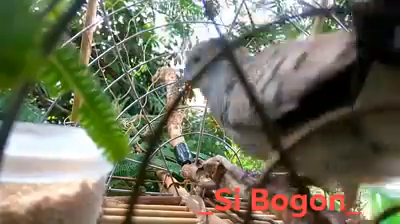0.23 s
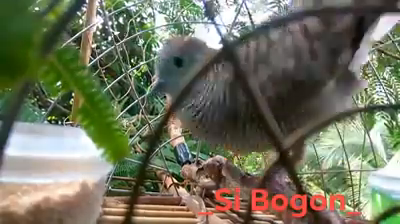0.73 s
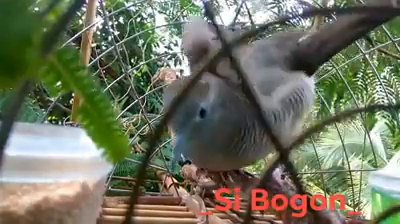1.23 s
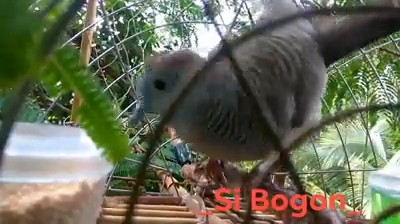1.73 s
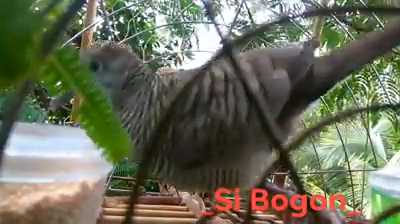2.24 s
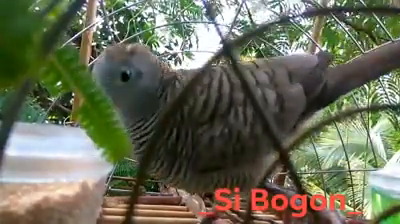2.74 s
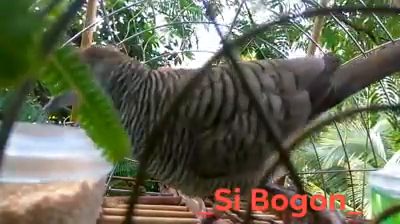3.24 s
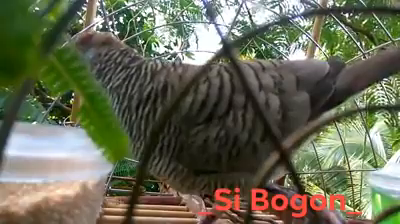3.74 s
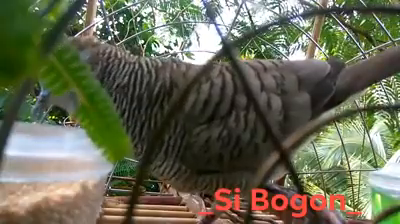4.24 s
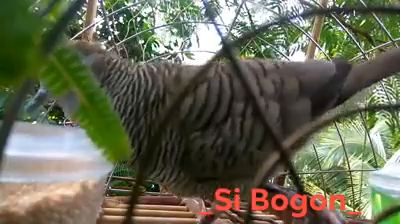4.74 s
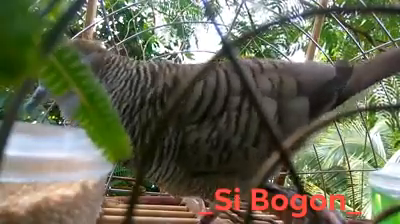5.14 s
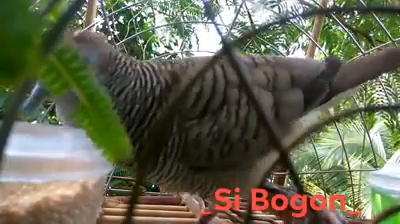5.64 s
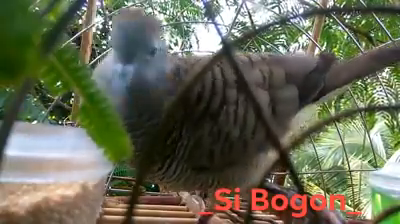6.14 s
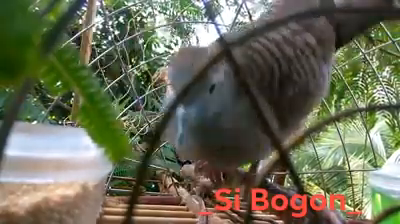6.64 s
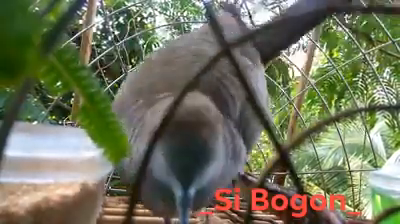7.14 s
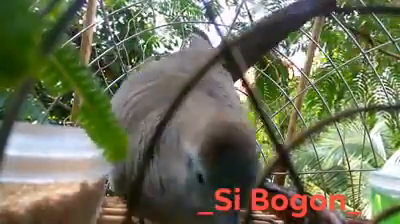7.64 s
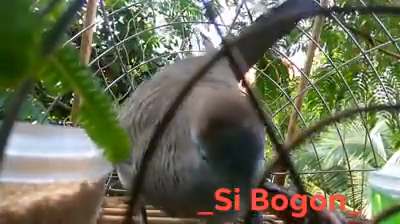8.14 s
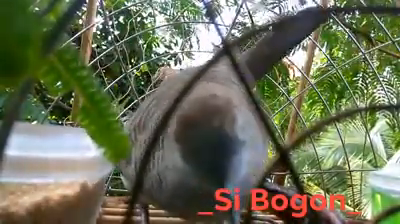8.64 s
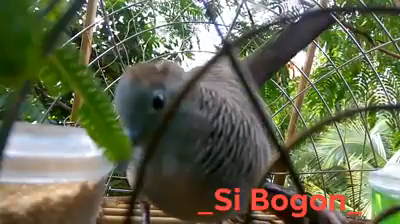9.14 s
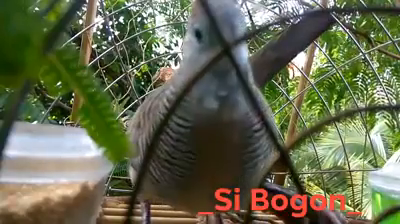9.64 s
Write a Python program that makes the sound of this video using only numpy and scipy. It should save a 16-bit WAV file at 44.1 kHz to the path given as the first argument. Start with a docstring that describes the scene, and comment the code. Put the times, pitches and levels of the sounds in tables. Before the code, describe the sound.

Close outdoor stereo pickup, with the near dove strongly toward the right. Its coos are almost pure, round, whistle-like tones with throaty rattling starts, packed into rapid loud bursts with long pauses. Between bursts a much fainter dove farther away repeats five fluttering notes with a slight echo. Low town rumble and thin leaf hiss continue underneath, with faint small-bird chips early, sparse dry cage ticks and a brief distant motor drone later.

```python
"""A caged zebra dove coos loudly, close by, in rapid stuttering phrases of nearly pure, pitch-swept tones.
Each close coo opens with a rattle of throat pulses, swells as it rises, flips into a higher register, sinks.
Farther off a second dove repeats a soft five-note phrase, fluttering as each note catches.
Behind them a garden: shaped noise for town rumble and leaf hiss, wavering tones for a far motor and
town hum, short noise bursts for a few ticks and a small bird's chips."""
import sys
import numpy as np
from scipy import signal
from scipy.fft import rfft, irfft
from scipy.io import wavfile
from scipy.ndimage import uniform_filter1d, minimum_filter1d

SR = 44100
rng = np.random.default_rng(int(sys.argv[2]) if len(sys.argv) > 2 else 0)


def unload_audio(sound):
    """Save the sound as a 16-bit wav file, at the path given as the first command line argument."""
    columns = np.transpose(np.atleast_2d(sound))
    # keep every value between -1 and 1, then stretch to whole-number steps
    steps = np.round(np.clip(columns, -1, 1) * 32767)
    wavfile.write(sys.argv[1], SR, steps.astype(np.int16))


N = 435708
TIME_S = np.arange(N) / SR
FLIP_HZ = 980.3  # pitch at which a note flips into the high register
SPLIT_HZ = 500  # rumble below, hiss above

# Close coos. Each row: onset in seconds, rise up to the register flip in seconds, hold after it in seconds,
# top pitch in Hz, hold level in dB, strain (0-1).
CLOSE_COOS = [(2.697, 0.060, 0.035, 1198, -14, 0), (2.794, 0.02, 0.022, 1156, -13, 0),
              (2.848, 0.021, 0.019, 1113, -12.5, 0), (2.923, 0.024, 0.017, 1100, -11.5, 0),
              (3.014, 0.024, 0.028, 1136, -15.5, 0.03), (3.121, .026, 0.083, 1165, -16, 0.03),
              (6.206, 0.073, 0.011, 951, -13.5, 0), (6.508, 0.053, 0.035, 1162, -14.5, 0.02),
              (6.600, 0.029, 0.024, 1135, -17, 0), (6.674, 0.024, 0.02, 1095, -17, 0.06),
              (6.758, 0.025, 0.022, 1096, -16.5, 0.07), (6.852, 0.026, 0.044, 1125, -17.5, 0),
              (9.664, 0.053, 0.044, 1182, -12.5, 0), (9.744, 0.025, 0.028, 1174, -12.5, 0.04),
              (9.797, 0.022, 0.02, 1120, -9, 0.26)]
# Shared by the coos of one phrase. Each row: valid from in seconds, starting pitch in Hz, swell level in dB,
# left-right in dB, third harmonic in dB, hiss in dB, rattle pulses per second, pulse ringing in Hz,
# pulse growth in dB.
CLOSE_PHRASES = [(2.6, 848, -12, -20.5, -49, -16.5, 215, 1085, 13),
                 (6.1, 876, -10.5, -18, -54, -10, 130, 930, 3),
                 (6.45, 816, -10, -16, -42.5, -1, 160, 995, 10),
                 (9.6, 843, -9.5, -15, -39.5, -5.5, 205, 1014, 12)]
# Hesitant starts, separate throat pops. Each row: start in seconds, level in dB, ringing in Hz.
THROAT_POPS = [(6.117, -27.5, 990), (6.127, -34, 970), (6.142, -26.5, 980), (6.149, -19.5, 1020),
               (6.166, -18.5, 1010), (6.177, -22, 980), (6.182, -22.5, 950), (6.189, -20, 920),
               (6.201, -21, 950), (9.873, -21, 1000)]
# Rasp below the pitch: low edge in Hz, high edge in Hz.
RASP_BAND_HZ = (390, 760)
# Bands of hiss that follow the coo. Each row: low edge in Hz, high edge in Hz, level in dB,
# to which the phrase's hiss level is added.
COO_HISS = [(1700, 2000, -43.5), (2680, 3550, -48), (6200, 6800, -47.5)]
RATTLE_SHARE = .33  # part of the rise that is rattle, before the tone catches
CATCH_DEPTH = .35  # flutter as a note catches (0-1)
SINK_SHARE = .17  # part of the top pitch lost over the hold


def close_dove(second_db=-39, overtones_lean_db=-9, rasp_db=7.0, swell_rasp_db=-48, crop_hz=1290):
    """Nearly pure coos through the inflated crop, each led in by a growing rattle of throat pulses."""
    voice, overtones = np.zeros((2, N)), np.zeros((2, N))
    pulses, end_s = list(THROAT_POPS), 0
    for onset_s, rise_s, hold_s, top_hz, hold_db, strain in CLOSE_COOS:
        phrase = [p for p in CLOSE_PHRASES if p[0] <= onset_s][-1]
        _, low_hz, swell_db, lean_db, third_db, hiss_db, rate_hz, ring_hz, growth_db = phrase
        voiced_s = onset_s + RATTLE_SHARE * rise_s
        level, phase, upper = coo((1 - RATTLE_SHARE) * rise_s, hold_s, scoop_from(low_hz, voiced_s - end_s),
                                  top_hz, swell_db, hold_db, strain, CATCH_DEPTH, SINK_SHARE,
                                  flutter_hz=rate_hz)
        size = len(phase)
        end_s = onset_s + rise_s + hold_s
        pulses += rattle(onset_s, voiced_s, end_s, swell_db, rate_hz, ring_hz, growth_db)

        # rasp: faint in every swell, strong when a strained note breaks up
        rasp_gain = from_db(rasp_db) * upper * strain ** 2 + from_db(swell_rasp_db) * (1 - upper)
        rasp = rasp_gain * hiss_in(*RASP_BAND_HZ, size, order=6)
        add(voice, voiced_s, pan(lean_db) * level * (np.sin(phase) + rasp))

        # a clean second harmonic comes out in the high register
        clean = upper * from_db(second_db) * np.sin(2 * phase) + whistles(phase, 1)
        # a grainy third harmonic and bands of hiss follow the coo, by phrase
        hiss = sum(from_db(db) * hiss_in(low, high, size) for low, high, db in COO_HISS)
        grain = from_db(4 * drift(300)[:size] - 1)
        third = from_db(third_db) * ragged(phase, order=3)
        harsh = (.5 + .5 * upper) * grain * (third + from_db(hiss_db) * hiss)
        add(overtones, voiced_s, pan(overtones_lean_db) * level * (clean + harsh))
    voice += pan(-15) * throat(pulses, t60_s=.0075)
    # beak shut: the sound leaves through the crop, which passes little above the pitch
    return band(voice, 190, crop_hz, order=8) + overtones + buzzes()


STRAIGHT_FALL_S, ARCHING = .017, .7  # a hold this long sinks evenly; longer ones stay up, then drop
CLIMB_S = .01  # time constant of the climb after the flip


def coo(swell_s, hold_s, start_hz, top_hz, swell_db, hold_db, rough, catch, sink, flutter_hz=200,
        flip_s=.0026, release_s=.015, bend=.063, climb=0, lift_hz=0):
    """Envelope, phase and register (0 low, 1 high) of a note: rising swell, flip upward, sinking hold."""
    t = np.arange(0, swell_s + hold_s, 1 / SR)
    rise = np.clip(t / swell_s, 0, 1)
    fall = np.clip((t - swell_s) / hold_s, 0, 1)
    upper = .5 + .5 * np.tanh((t - swell_s) / flip_s)

    arch_hz = top_hz * (1 - sink * fall ** ((hold_s / STRAIGHT_FALL_S) ** ARCHING))
    arch_hz = arch_hz * (1 - climb * np.exp(-fall * hold_s / CLIMB_S))
    swell_hz = lift_hz + start_hz + (min(FLIP_HZ, top_hz) - start_hz) * rise
    pitch_hz = (1 - upper) * swell_hz + upper * arch_hz

    swell = from_db(swell_db) * np.interp(rise, [0, .8], [.22, 1])
    level = (1 - upper) * swell + upper * from_db(hold_db)
    level = level * np.clip(t / .0036, 0, 1) * np.clip((t[-1] - t) / release_s, 0, 1)

    # the rattle lives on as a flutter while the tone is catching; it returns in a strained hold
    flutter = np.sin(2 * np.pi * np.cumsum(flutter_hz * (1 + .4 * drift(44)[:len(t)])) / SR)
    depth = rough * upper + catch * (1 - rise) ** 2
    pitch_hz = pitch_hz * (1 + bend * depth * flutter + .0009 * drift(150)[:len(t)])
    phase = 2 * np.pi * np.cumsum(pitch_hz) / SR
    return np.sqrt(2) * level * (1 + depth * flutter), phase, upper


def scoop_from(low_hz, pause_s, slacken_s=.0022):
    """The pitch slackens in a pause: a note slurred onto the last one starts near the flip."""
    return low_hz + (FLIP_HZ - low_hz) * np.exp(-max(pause_s, 0) / slacken_s)


TREMBLE_S, TREMBLE_DB = .02, -36.5  # tremble after a note; level relative to the swell


def rattle(onset_s, voiced_s, end_s, swell_db, rate_hz, ring_hz, growth_db, rattle_db=-3.5):
    """Throat pulses, (s, dB, Hz): they grow until the tone catches, and tremble on faintly after it ends."""
    lead_s = voiced_s - onset_s
    chance = rng.standard_normal((2, 20, 2))
    before, after = [], []
    for s, (slip, force) in zip(np.arange(0, lead_s, 1 / rate_hz), chance[0]):
        db = swell_db + rattle_db - growth_db * (1 - s / lead_s) + .78 * force
        before.append((onset_s + s + .00055 * slip, db, ring_hz))
    for s, (slip, force) in zip(np.arange(0, TREMBLE_S, 1 / rate_hz), chance[1]):
        after.append((end_s + s + .00096 * slip, swell_db + TREMBLE_DB + 2 * force, ring_hz))
    return before + after


def throat(pulses, t60_s, low_hz=680, puff_db=-35, puff_s=.0025):
    """Each (s, dB, Hz) pulse rings briefly in the inflated crop, with little bass, and puffs out air."""
    out, t = np.zeros(N), TIME_S[:SR // 40]
    click = np.eye(1, len(t))[0]
    for s, db, hz in pulses:
        response = ring(ring(click, hz, t60_s), hz * .93, t60_s)
        response = band(response, low_hz, 2900, order=3)
        puff = from_db(puff_db) * band(rng.standard_normal(len(t)), 1100, 5000) * np.exp(-t / puff_s)
        add(out, s, from_db(db) * (response / np.abs(response).max() + puff))
    return out


def ragged(phase, order, scatter=.14):
    """A harmonic whose timing slips from cycle to cycle."""
    return np.sin(order * phase + scatter * np.sqrt(order) * drift(300)[:len(phase)])


# Whistles that move with a coo. Each row: offset from its pitch in Hz (negative for a mirror image),
# level beside a close coo in dB, level beside a far coo in dB.
WHISTLE_LINES = [(3757.5, -50.5, -23), (-7500, -61.5, -26.5), (7507, -61, -26), (11254, -69.5, -30)]


def whistles(phase, column):
    """Faint high lines that keep a fixed distance from the pitch."""
    t = np.arange(len(phase)) / SR
    return sum(from_db(row[column]) * np.sin(phase + 2 * np.pi * row[0] * t) for row in WHISTLE_LINES)


# Brief buzzes at four register flips. Each row: centre in seconds, level in dB.
FLIP_BUZZES = [(6.56, -42.5), (9.718, -32), (9.767, -40), (9.8203, -35)]
# Lines in each buzz. Each row: frequency in Hz, relative level in dB.
BUZZ_LINES = [(3170, 2), (4880, -2.5), (7000, -13), (8680, -17), (10800, -29), (12350, -29)]


def buzzes(width_s=.0019, lean_db=-12):
    """A few milliseconds of buzz: high lines of fixed pitch in a bell envelope."""
    t, out = TIME_S[:SR // 50] - 1 / 100, np.zeros(N)
    for s, db in FLIP_BUZZES:
        buzz = sum(from_db(line_db) * np.sin(2 * np.pi * (hz * t + rng.random()))
                   for hz, line_db in BUZZ_LINES)
        add(out, s + t[0], from_db(db) * buzz * np.exp(-(t / width_s) ** 2))
    return pan(lean_db) * out


# The far phrase before stretching. Each row: start within it in seconds, swell in seconds, hold in seconds,
# top pitch in Hz, share of pitch lost over the hold, swell level in dB, hold level in dB,
# lift of a slurred swell in Hz.
FAR_NOTES = [(0, 0.0279, 0.114, 1186, 0.074, -43, -48, 3), (0.145, .022, 0.027, 1194, .15, -51, -47.5, 106),
             (0.225, 0.0124, 0.033, 1130, 0.088, -42, -50.5, 0),
             (.323, .015, .112, 1135, .18, -44, -51, -6), (0.574, 0.017, 0.1103, 1128, 0.084, -45, -53, 1)]
# Each row: phrase start in seconds, time stretch (factor).
FAR_STARTS = [(.618, .998), (4.351, 1.0), (8.495, 1.1)]
FAR_LOW_HZ = 877  # starting pitch before the lift
FAR_CLIMB = .056  # share of the top pitch still to climb after the flip


def far_dove(lean_db=-10, echo_s=.03, echo_db=-16):
    """The same five notes each time, a little faster or slower, with one echo from across the garden."""
    out = np.zeros(N)
    for s, stretch in FAR_STARTS:
        for after_s, swell_s, hold_s, top_hz, sink, swell_db, hold_db, lift_hz in FAR_NOTES:
            level, phase, _ = coo(stretch * swell_s, stretch * hold_s, FAR_LOW_HZ, top_hz, swell_db, hold_db,
                                  rough=.071, catch=.33, sink=sink, release_s=.0075, climb=FAR_CLIMB,
                                  lift_hz=lift_hz)
            waver = from_db(1.1 * drift(25)[:len(level)])
            note = level * waver * (np.sin(phase) + whistles(phase, 2))
            start_s = s + stretch * after_s
            add(out, start_s, note)
            add(out, start_s + echo_s, from_db(echo_db) * note)
    return pan(lean_db) * out


# Each row: start in seconds, relative level in dB, decay time constant in seconds.
CAGE_TICKS = [(4.620, -43, .003), (4.665, -37, 0.0065), (5.994, -46.5, 0.011), (7.441, -47, 0.017),
              (7.693, -48, .005)]
# Small bird. Each row: centre in seconds, length in seconds, pitch in Hz, level in dB before the fades.
BIRD_CHIPS = [(0.578, 0.082, 9200, -61.5), (0.933, 0.086, 9100, -62.5)]


def small_sounds(body_hz=4200, body_db=-1):
    """Dry ticks on the cage, decaying noise bursts; a small bird's chips, narrow noise swelling and fading."""
    t, out = TIME_S[:SR // 10], np.zeros(N)
    for s, db, decay_s in CAGE_TICKS:
        snap = .51 * hiss_in(2000, 12000, len(t))
        body = from_db(body_db) * hiss_in(.53 * body_hz, 1.12 * body_hz, len(t))
        add(out, s, .5 * from_db(db) * (snap + body) * np.exp(-t / decay_s))
    for s, length_s, hz, db in BIRD_CHIPS:
        size = int(length_s * SR)
        chip = np.hanning(size) * hiss_in(hz * .94, hz * 1.05, size, order=2)
        add(out, s - length_s / 2, from_db(db) * chip)
    return pan(-10) * out


# Each row: delay in seconds, level in dB.
NEAR_BOUNCES = [(.0105, -19), (.0235, -27)]


def bounces(x):
    """The left microphone is shaded from the bird, so nearby surfaces colour what it hears."""
    out = np.zeros((2, N))
    for delay_s, db in NEAR_BOUNCES:
        add(out[0], delay_s, from_db(db) * x.mean(0))
    return out


def porch(x, wet_db, t60_s):
    """Weak, quickly dying reflections from the surfaces round the cage, as decaying noise tails."""
    t = TIME_S[:SR // 2]
    tail = band(rng.standard_normal((2, len(t))), 300, 4400)
    tail = tail * np.exp(-np.log(1000) * t / t60_s) * np.clip(t / .0037, 0, 1) ** 2
    tail /= np.sqrt(np.sum(tail ** 2, axis=1, keepdims=True))
    return from_db(wet_db) * pan(-1) * signal.oaconvolve(x.mean(0)[None], tail, axes=1)[:, :N]


# Motor drone. Each row: time in seconds, level in dB before a 4.5 dB cut.
MOTOR_DRONE = [(6.85, -67), (7.0, -43), (7.25, -49.5), (7.45, -42), (7.75, -40), (8.1, -45), (8.8, -55),
               (9.6, -62)]
# Its brief higher whine. Each row: time in seconds, level in dB.
WHINE_SWELL = [(6.95, -82), (7.15, -57), (7.45, -52), (7.65, -68), (7.9, -72)]
# Lines in the whine. Each row: frequency in Hz, relative level in dB.
WHINE_TONES = [(692, -6), (750, -3.5), (815, -3.5)]
# Steady town hum. Each row: frequency in Hz, level in dB.
TOWN_HUM = [(152, -60.5), (193, -65.5), (263, -70), (315, -66.5)]


def far_motor(drone_hz=162):
    """A wavering drone with a brief whine above it, over the town's faint hum: tones of drifting pitch."""
    def line(hz, wander):
        tone = np.sin(2 * np.pi * np.cumsum(hz * (1 + wander * drift(6.96))) / SR)
        return np.sqrt(2) * tone * from_db(2 * drift(13))
    whine = sum(from_db(db) * line(hz, wander=.014) for hz, db in WHINE_TONES)
    hum = sum(from_db(db) * line(hz, wander=.00805) for hz, db in TOWN_HUM)
    drone = from_db(in_time(MOTOR_DRONE) - 4.5) * line(drone_hz, wander=.0119)
    return pan(-12.5) * (drone + from_db(in_time(WHINE_SWELL)) * whine + hum)


# Left-right likeness of the noise. Each row: frequency in Hz, likeness (correlation).
EAR_LIKENESS = [(60, 0.96), (130, 0.97), (290, 0.9), (640, 0.62), (1410, -0.07), (3100, 0.48), (6820, 0.14),
                (15000, 1)]
# Each row: frequency in Hz, left-right in dB.
EAR_LEAN = [(60, -10.5), (130, -9), (290, -11), (640, -11.5), (1410, -12.5), (3100, -5.5), (6820, -1.5),
            (15000, -15)]


def background(spectrum, low_hz, high_hz, waver_db):
    """Coloured stereo noise, alike in the bass, more diffuse through much of the treble, slowly wavering."""
    hz = np.arange(N // 2 + 1) * SR / N
    mid, side = rfft(rng.standard_normal((2, N)))
    alike = np.clip(at_hz(EAR_LIKENESS, hz), 0, 1)
    ears = np.sqrt(1 + alike) * mid + np.sqrt(1 - alike) * side * [[1], [-1]]
    ears = ears * pan(at_hz(EAR_LEAN, hz)) / np.sqrt(1 + alike)
    noise = irfft(ears * from_db(at_hz(spectrum, hz)) * (hz > low_hz) * (hz < high_hz), N)
    return noise / noise.mean(0).std() * from_db(waver_db * drift(1.4))


def from_db(db):
    """Decibels to gain."""
    return 10 ** (np.asarray(db) / 20)


def rms_one(x):
    """Scale to unit rms."""
    return x / np.sqrt(np.mean(x ** 2) + 1e-20)


def in_time(rows):
    """A curve at every sample."""
    return np.interp(TIME_S, *np.transpose(rows))


def at_hz(points, hz):
    """A spectrum read on a log-frequency axis."""
    f, value = np.transpose(points)
    return np.interp(np.log(np.maximum(hz, 1)), np.log(f), value)


def band(x, low_hz, high_hz, order=2):
    """Butterworth band-pass."""
    edges_hz = [low_hz, min(high_hz, .45 * SR)]
    return signal.sosfilt(signal.butter(order, edges_hz, "band", fs=SR, output="sos"), x + 1e-18)


def hiss_in(low_hz, high_hz, size, order=3):
    """A band of noise of unit rms."""
    return rms_one(band(rng.standard_normal(SR // 4), low_hz, high_hz, order=order)[-size:])


def drift(rate_hz, size=N):
    """Slow chance of unit rms: noise through two equal poles, made at 1/40 of the sample rate."""
    r = np.exp(-80 * np.pi * rate_hz / SR)
    noise = rng.standard_normal(size // 40 + 2002)
    slow = signal.lfilter([1], [1, -2 * r, r * r], noise)[2000:]
    return np.interp(np.arange(size) / 40, np.arange(len(slow)), rms_one(slow))


def ring(clicks, hz, t60_s):
    """Two-pole resonator: a unit click sets a decaying sine of height about 1 ringing."""
    r, w = np.exp(-np.log(1000) / (t60_s * SR)), 2 * np.pi * hz / SR
    return signal.lfilter([0, np.sin(w)], [1, -2 * r * np.cos(w), r * r], clicks + 1e-18)


def pan(lean_db):
    """Left and right gains whose mean is 1."""
    left = from_db(lean_db)
    return np.reshape([2 * left / (1 + left), 2 / (1 + left)], (2, -1))


def add(out, s, sound):
    """Mix a sound in from time s."""
    i = int(s * SR)
    out[..., i:i + sound.shape[-1]] += sound[..., :N - i]


# Swell of the town rumble. Each row: time in seconds, gain in dB.
RUMBLE_SWELL = [(0, 0.5), (6.5, 0), (7.3, 0.9), (8.8, 1.5), (9.88, 0.5)]
# Noise shapes. Each row: frequency in Hz, relative density in dB per Hz.
RUMBLE_SHAPE = [(13, -64.5), (22, -30.5), (27, -34.5), (35, -32.5), (46, -7.5), (70, 0.5), (137, -6),
                (178, -10.5), (264, -13.5), (312, -14.5), (361, -17.5), (500, -19.5), (650, -51),
                (1100, -120)]
HISS_SHAPE = [(290, -31), (500, 3), (737, 1), (803, 1), (1290, -5.5), (1820, -7.5), (2430, -7.5),
              (4250, -13.5), (4640, -14.5), (5200, -15), (6830, -19.5), (8600, -18), (11000, -28),
              (14400, -24.5), (15500, -23)]
RUMBLE_DB, HISS_DB = -44, -52.5  # rms, before swell and waver


def scene():
    """Two doves, reflections, and the garden's background."""
    near, far = close_dove() + small_sounds(), far_dove()
    echoes = bounces(near) + porch(near, wet_db=-38, t60_s=.27) + porch(far, wet_db=-14, t60_s=.52)
    rumble_gain = from_db(RUMBLE_DB + in_time(RUMBLE_SWELL))
    rumble = rumble_gain * background(RUMBLE_SHAPE, 10, SPLIT_HZ, waver_db=.77)
    hiss = from_db(HISS_DB) * background(HISS_SHAPE, SPLIT_HZ, SR / 2, waver_db=.3)
    return near + far + echoes + rumble + hiss + far_motor()


def record(dry, ceiling=1.0, cutoff_hz=15400):
    """A quick limiter holds the peaks to full scale; then a steep low-pass cuts the top."""
    room = np.minimum(1, ceiling / (np.abs(dry) + 1e-9))
    gain = uniform_filter1d(minimum_filter1d(room, size=177), size=177)  # 4 ms
    return signal.sosfilt(signal.ellip(10, .1, 80, cutoff_hz, fs=SR, output="sos"), dry * gain)


dry = scene()
out = record(dry)
unload_audio(out)
```